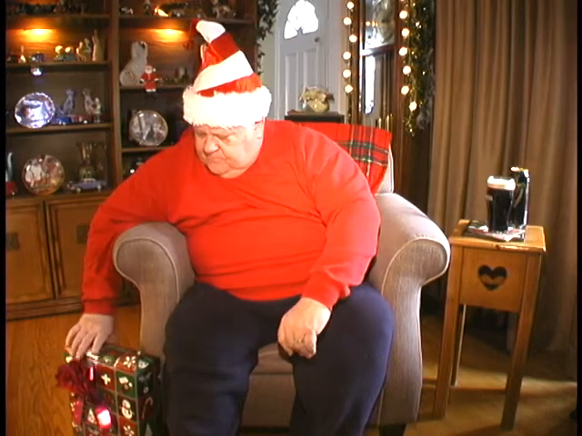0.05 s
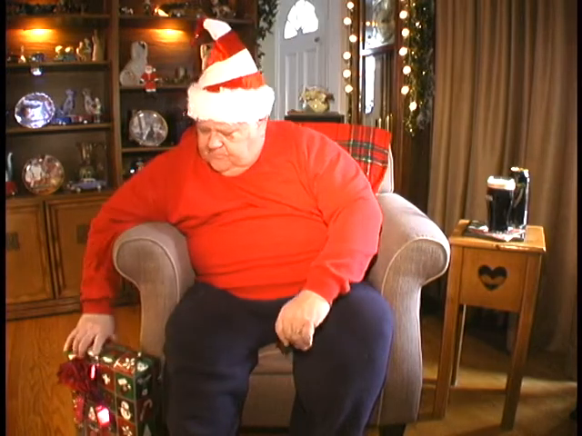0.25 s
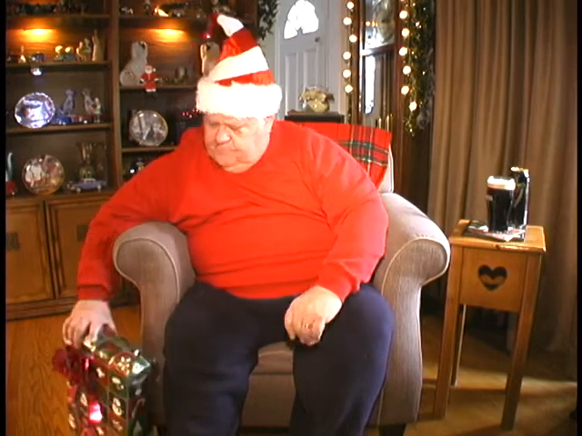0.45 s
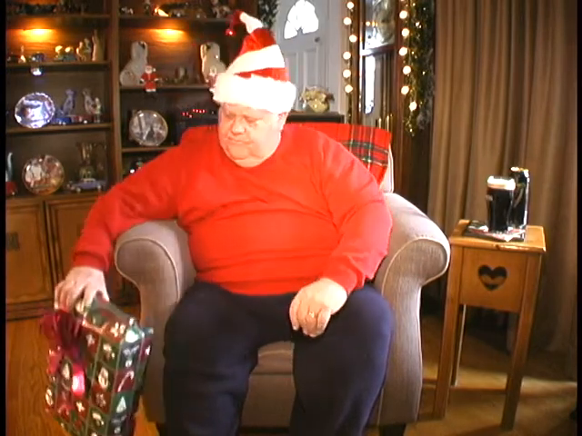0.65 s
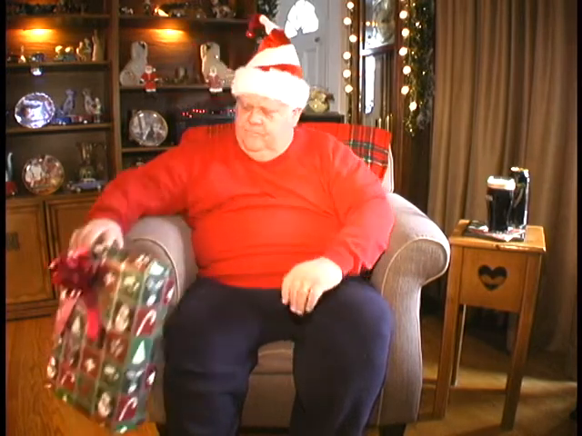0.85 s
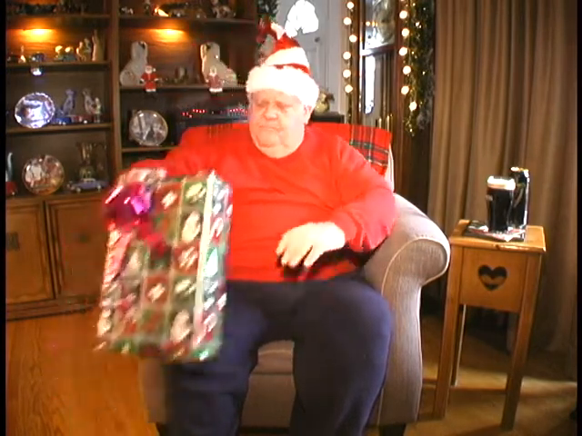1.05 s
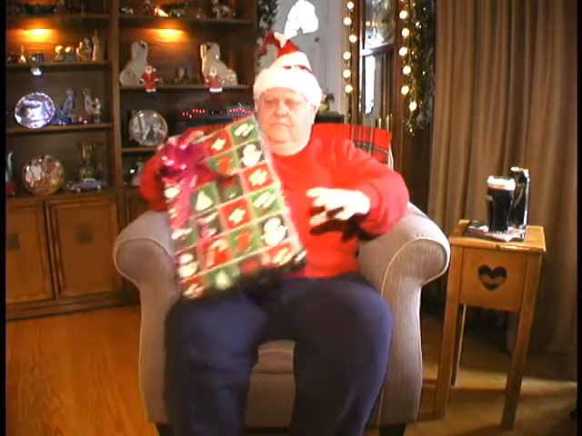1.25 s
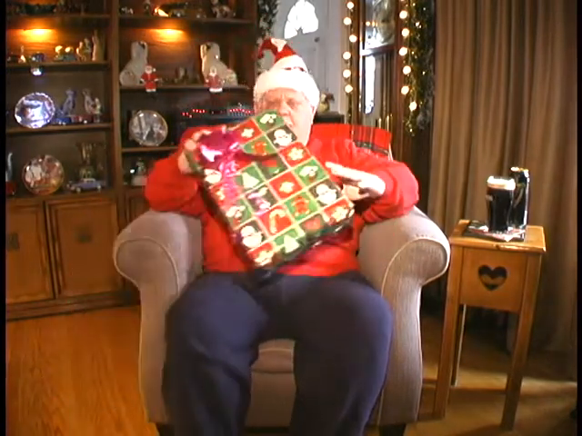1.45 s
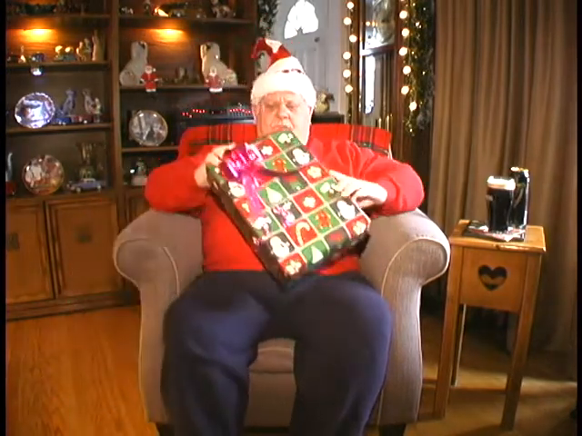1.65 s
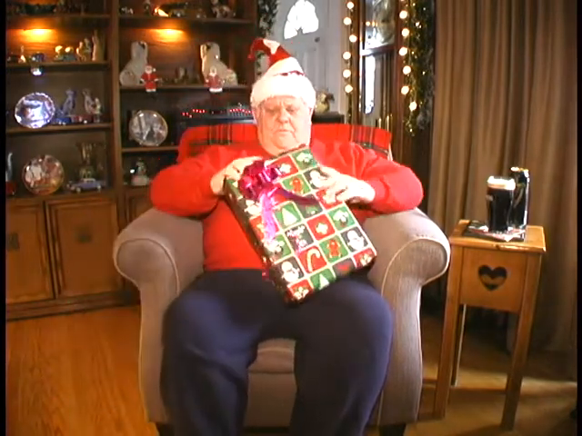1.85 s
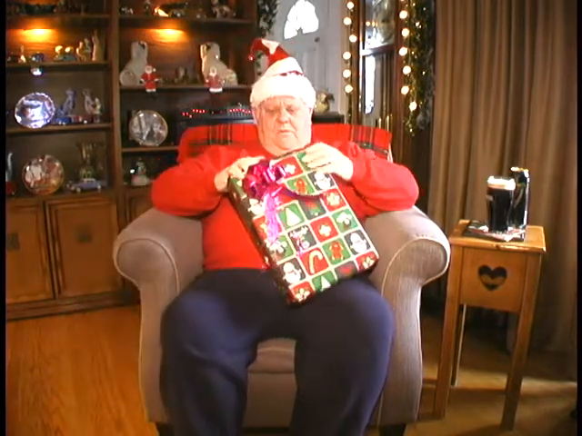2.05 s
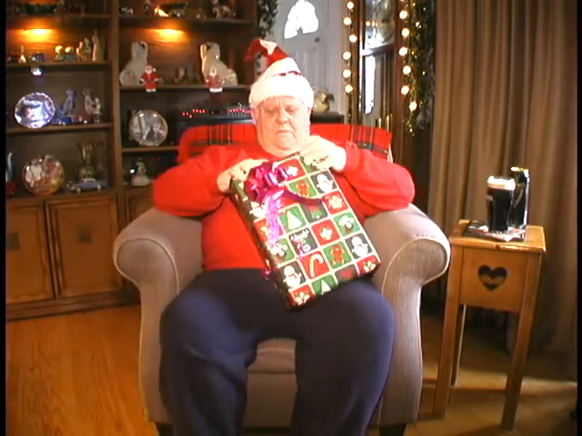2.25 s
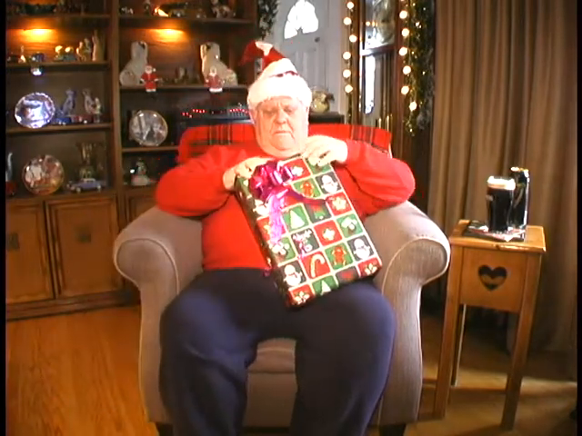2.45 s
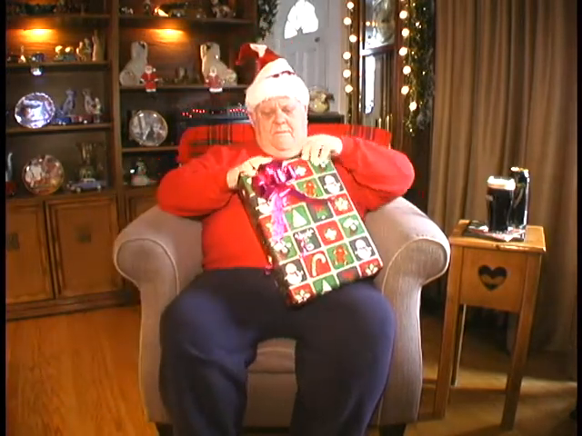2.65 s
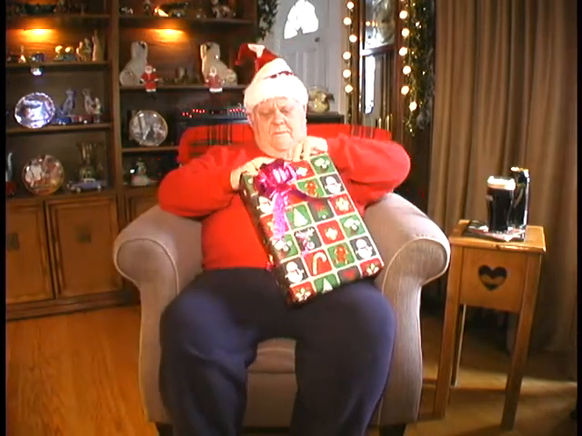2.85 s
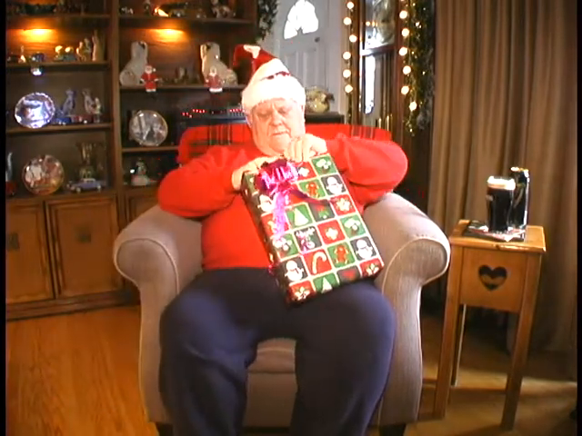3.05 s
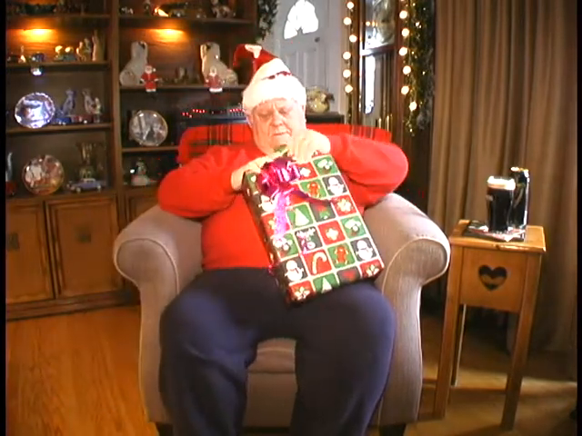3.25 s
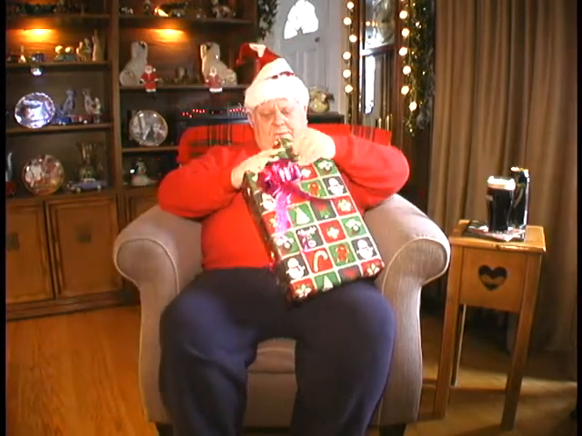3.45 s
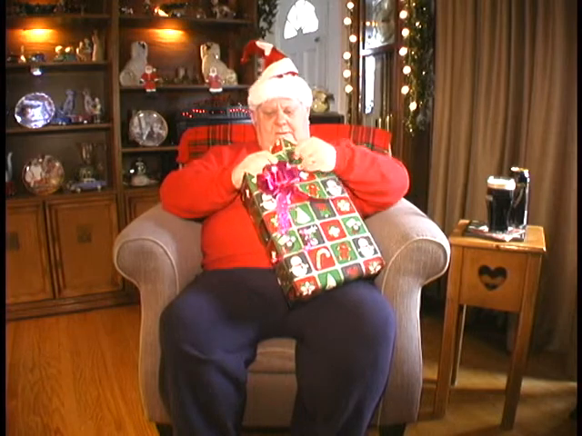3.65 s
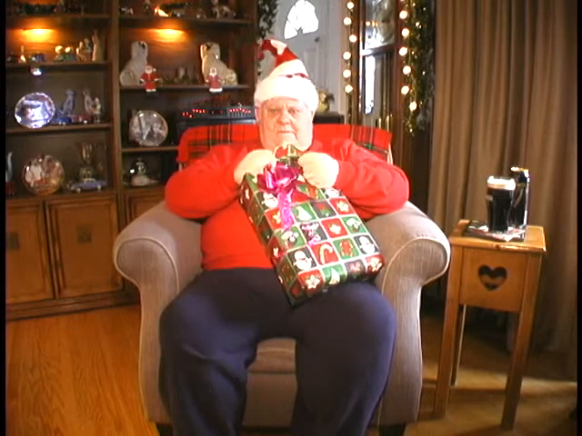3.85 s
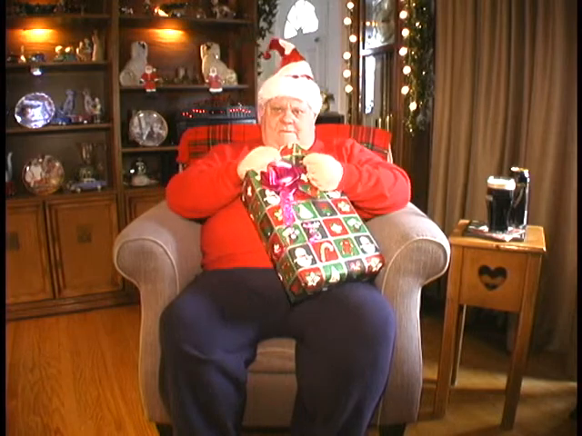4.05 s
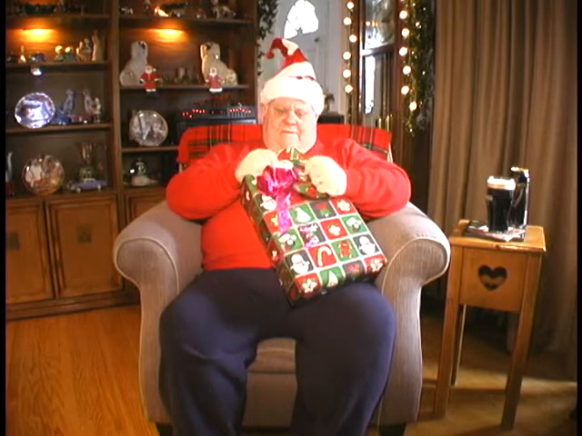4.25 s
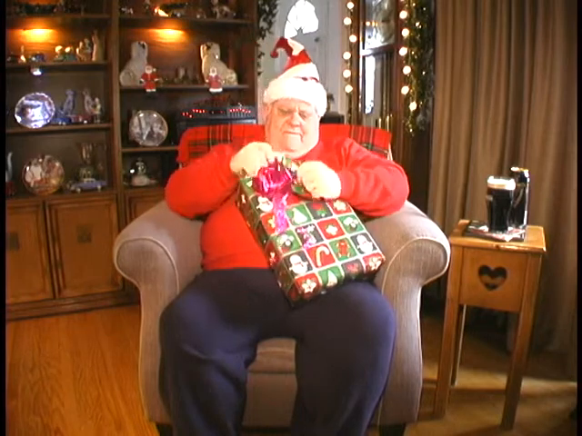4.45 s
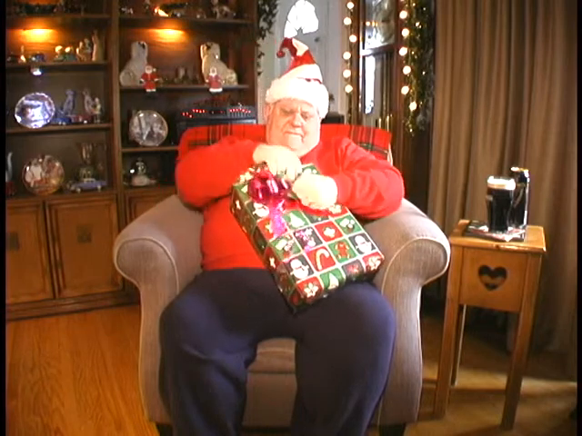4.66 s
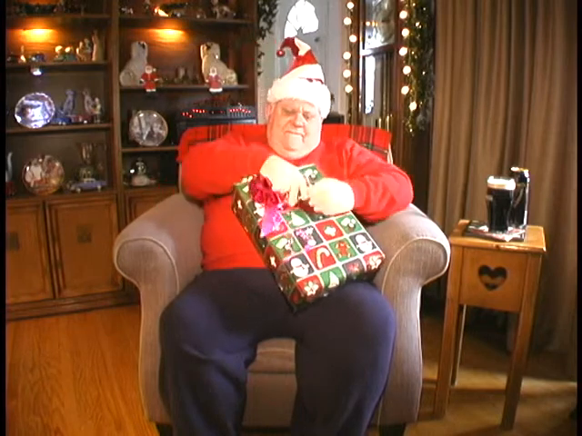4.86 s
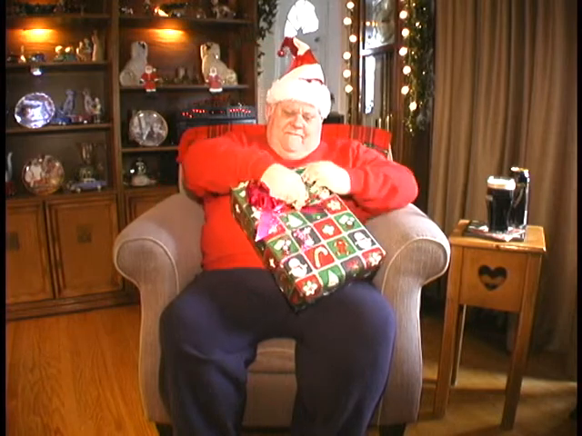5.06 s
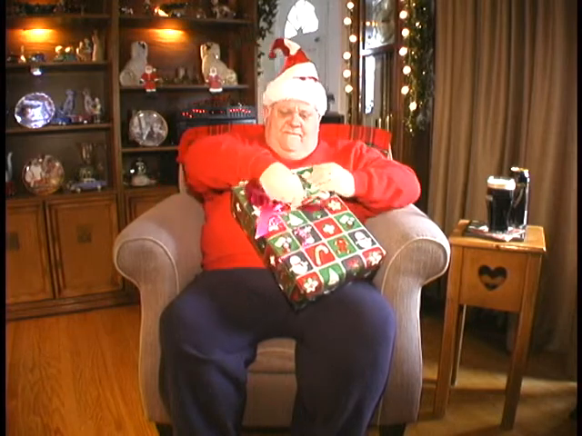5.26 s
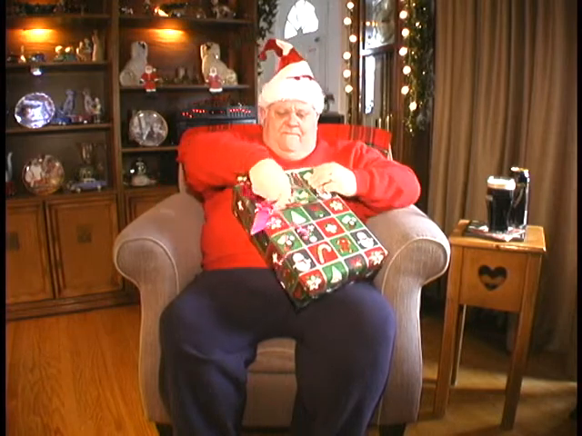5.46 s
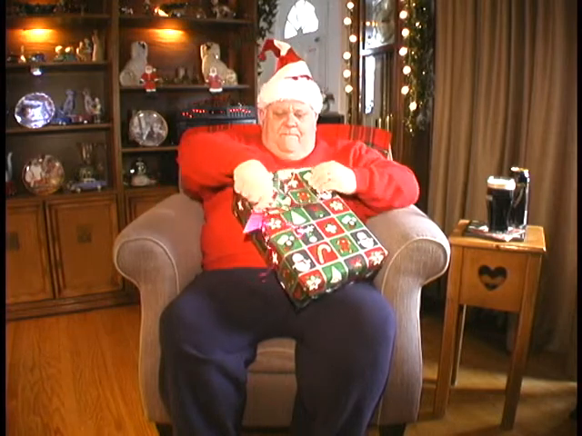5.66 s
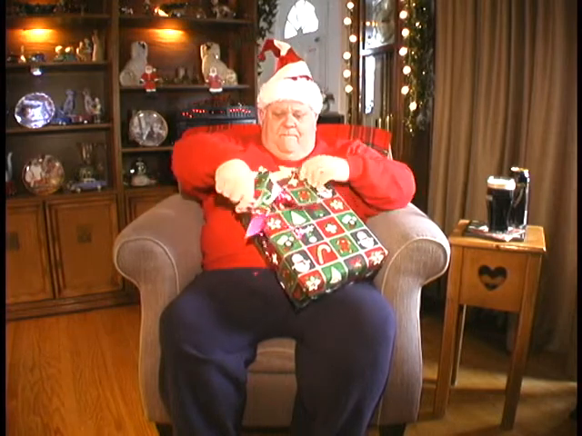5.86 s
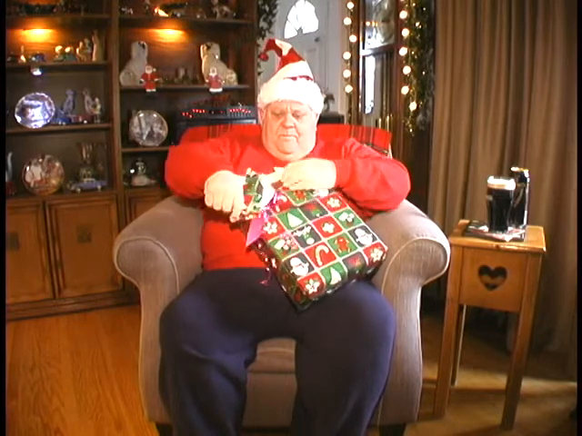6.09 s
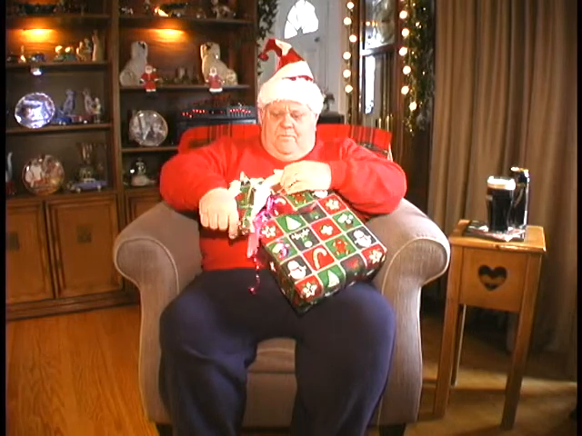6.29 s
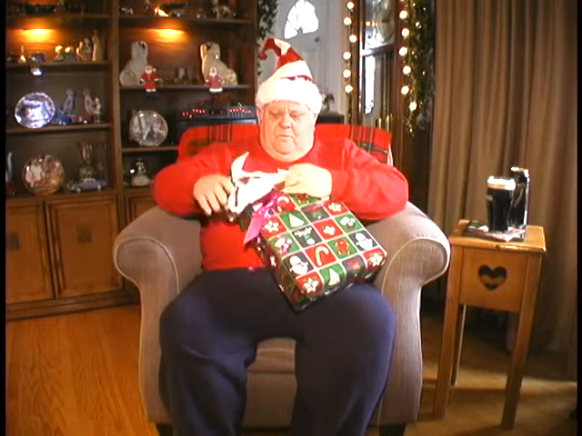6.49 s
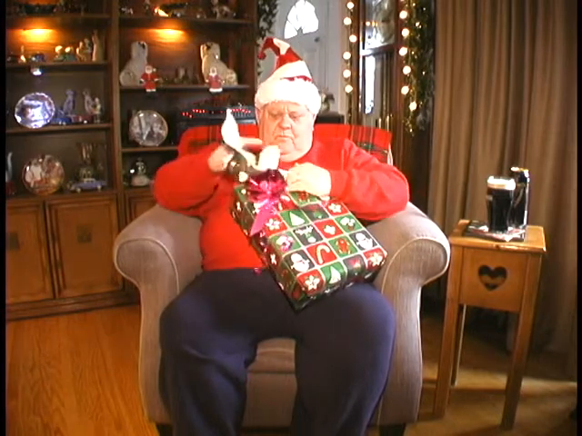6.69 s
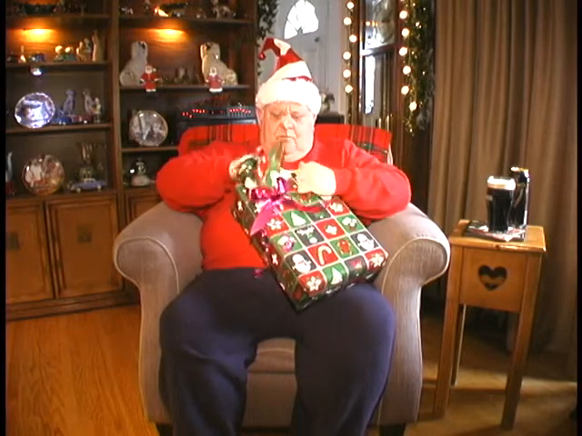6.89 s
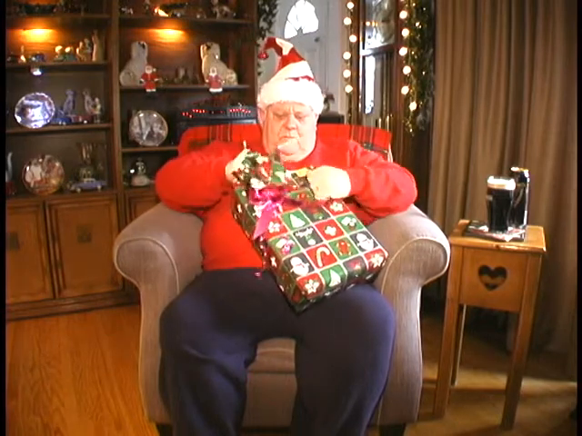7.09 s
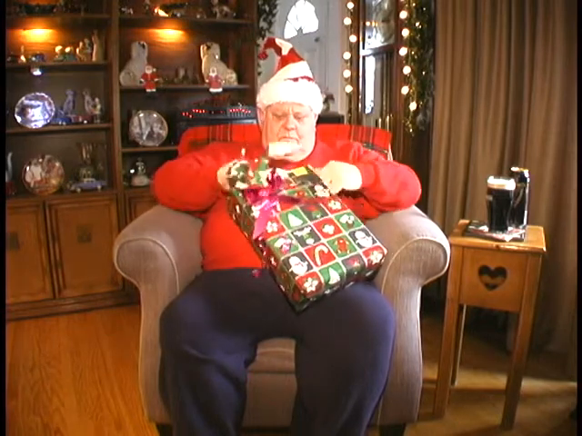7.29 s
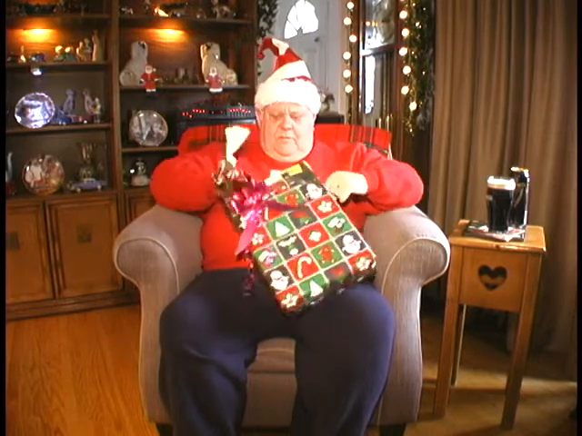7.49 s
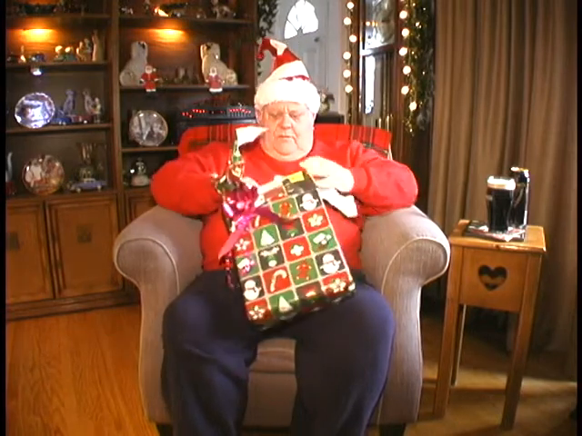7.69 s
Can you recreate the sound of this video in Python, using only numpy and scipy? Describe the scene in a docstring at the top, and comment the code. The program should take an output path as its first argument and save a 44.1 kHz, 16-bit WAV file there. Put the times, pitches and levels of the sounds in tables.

```python
"""In a furnished living room, a few metres away, a gift box wrapped in thin glossy paper is lifted off
the floor onto a lap and torn open. Creases buckle and fibres part in showers of tiny clicks, with
louder snaps among them. The box brushes an armrest once, and its hollow cardboard booms softly under
the hands. Behind it all are the faint rumble of the house, a hiss and a thin electrical whine."""
import sys
import numpy as np
from scipy import signal
from scipy.fft import rfft, irfft, next_fast_len
from scipy.io import wavfile
from scipy.ndimage import uniform_filter1d

SR = 44100
rng = np.random.default_rng(int(sys.argv[2]) if len(sys.argv) > 2 else 0)


def wav_out(sig):
    """Save sig, one row per channel (or a flat mono array), as 16-bit PCM at SR to the path in sys.argv[1]."""
    wavfile.write(sys.argv[1], SR, np.round(np.clip(np.atleast_2d(sig).T, -1, 1) * 32767).astype(np.int16))


N = 340893


def from_db(db):
    """Turn decibels into a number to multiply a sound by."""
    return 10 ** (np.asarray(db) / 20)


def rms_one(x):
    """Scale a sound so that its average strength (rms) is 1."""
    return x / np.sqrt(np.mean(x ** 2) + 1e-30)


def in_time(rows):
    """Join (time_s, level_db) rows with straight lines: silent before the first, holding the last."""
    time_s, level_db = np.transpose(rows)
    return np.interp(np.arange(N) / SR, time_s, level_db, left=-120)


def at_hz(rows, hz):
    """Read between the rows of a (pitch_hz, value) table."""
    pitch_hz, values = np.transpose(rows)
    return np.interp(np.log(hz), np.log(pitch_hz), values)


def drift(rate_hz):
    """A smooth random wobble, about 1 in size."""
    r = np.exp(-80 * np.pi * rate_hz / SR)
    slow = signal.lfilter([1], [1, -2 * r, r * r], rng.standard_normal(N // 40 + 2002))[2000:]
    return np.interp(np.arange(N) / 40, np.arange(len(slow)), rms_one(slow))


def third_octaves(lowest_hz, count):
    """Filters that each let a third of an octave through, as (centre_hz, filter) pairs."""
    edges = lowest_hz * 2 ** (np.arange(count + 1) / 3)
    return [(np.sqrt(low * high), signal.butter(2, [low, high], "band", fs=SR, output="sos"))
            for low, high in zip(edges, edges[1:])]


def noise_spectra(colour):
    """The spectra of two unrelated noises with the given tone colour, and their frequencies."""
    hz = np.maximum(np.fft.rfftfreq(next_fast_len(N), 1 / SR), 1)
    white = rfft(rng.standard_normal((2, next_fast_len(N))))
    return white * from_db(at_hz(colour, hz)), hz


def left_right(mid, side, alike):
    """Mix two noises into left and right: alike is 0 for unrelated sides, 1 for equal ones."""
    return np.sqrt(1 + alike) * mid + np.sqrt(1 - alike) * side * [[1], [-1]]


def house():
    """Steady rumble and hiss, alike on both sides only in the bass, with thin electrical tones."""
    # tone colour of the rumble and hiss: pitch_hz, level_db
    colour = [(12, -29), (20, -3), (70, 1.5), (284, -4), (386, -11.5), (693, -13), (843, -13),
              (1390, -18.5), (1510, -13.5), (1890, -17.5), (4020, -18), (6650, -22), (8550, -18.5),
              (15800, -27)]
    # how alike left and right are: pitch_hz, likeness (0 to 1)
    likeness = [(60, 0.96), (180, 0.94), (550, 0.038), (1650, 0.16), (4970, 0.11), (15000, 0.14)]
    # steady electrical tones: pitch_hz, level_db
    tones = [(59.2, -76), (4027, -87), (7962, -92), (8409, -93), (11090, -95), (11386, -95)]
    (mid, side), hz = noise_spectra(colour)
    noise = irfft(left_right(mid, side, at_hz(likeness, hz)))[:, :N]
    t = np.arange(N) / SR
    whine = sum(np.sqrt(2) * from_db(db) * np.sin(2 * np.pi * hz * t) for hz, db in tones)
    noise_db = -63.5 + 0.2 * drift(rate_hz=7.1)
    return from_db(noise_db) * rms_one(noise) + whine


def reflections():
    """The room's answer to one click: a few near echoes, then a wash whose treble dies first."""
    # bounces off the box face, floor and cabinet: delay_s, level_db
    echoes = [(.0021, -12.5), (.0066, -13), (0.0101, -15.5)]
    fade_s, treble_fade_s, tail_db = 0.21, 0.11, -6  # a fade is the time to drop 60 dB
    t = np.arange(SR // 2) / SR
    mid, side = rng.standard_normal((2, len(t)))
    side = signal.sosfilt(signal.butter(2, 330, "high", fs=SR, output="sos"), side)  # same bass each side
    tail = left_right(mid, side, alike=0.069)
    dull = signal.sosfilt(signal.butter(1, 4500, fs=SR, output="sos"), tail)
    tail = dull * from_db(-60 * t / fade_s) + (tail - dull) * from_db(-60 * t / treble_fade_s)
    tail *= np.clip(t / 0.0093, 0, 1)  # the echoes need time to thicken
    response = from_db(tail_db) * rms_one(tail) / np.sqrt(len(t))
    for delay_s, db in echoes:
        response[:, round(delay_s * rng.uniform(.8, 1.2) * SR)] += from_db(db)
    return response


def living_room(sound, paths=4):
    """The sounding spot wanders over the sheet, so the sound reaches the walls by changing paths."""
    spot = rng.integers(0, paths, N // 600 + 1).repeat(600)[:N]
    echoes = sum(signal.oaconvolve((sound * (spot == k))[None], reflections(), axes=1)[:, :N]
                 for k in range(paths))
    dip_hz, width_hz = 477, 53  # the bounce off the floor cancels this pitch
    return signal.lfilter(*signal.iirnotch(dip_hz, dip_hz / width_hz, SR), sound + echoes)


def armrest_brush():
    """The wrapped box rubs over the armrest cloth with one smooth swish."""
    # rise and fall of the swish: time_s, level_db
    sweep = [(1.2, -82), (1.212, -71), (1.308, -52), (1.348, -54), (1.37, -60), (1.416, -82), (1.43, -82)]
    # tone colour of paper rubbing on cloth: pitch_hz, level_db
    cloth = [(600, -16), (900, -8), (3000, -5.5), (4100, 0), (5500, -7.5), (8000, -16), (12000, -25)]
    spectra, _ = noise_spectra(cloth)
    end_s = sweep[-1][0]
    level_db = np.where(np.arange(N) < end_s * SR, in_time(sweep), -120)
    return from_db(level_db - 3.5) * rms_one(irfft(spectra[0])[:N])


def cardboard_box(wide_db):
    """Moving paper shakes the hollow box and bumps push it; both make it boom at a few low pitches."""
    # shaking of the box when the paper's wide patches are at -47 dB: time_s, level_db
    shaking = [(0, -39.5), (2.0, -37.5), (3.2, -41), (4.3, -42.5), (5.1, -38.5), (6.2, -43.5),
               (6.75, -39.5), (7.35, -41.5), (7.5, -50.5), (7.73, -47)]
    # the box bumps a lap or palm: start_s, strength_db
    thumps = [(1.754, -43), (1.784, -44), (1.814, -46), (2.939, -43.5), (3.459, -57), (3.828, -41),
              (4.99, -48), (5.195, -45.5), (5.769, -47), (6.081, -47.5), (6.741, -52), (7.379, -47)]
    # the box's own low notes: pitch_hz, width_hz, level_db
    notes = [(40, 34, -11), (62, 21, -5), (87, 46, 1), (117, 57, -1), (159, 36, -0.5), (196.3, 15.3, 4),
             (297, 92, 0), (393, 44, -11.5)]
    follows, lag_s = .9, 0.0074  # the cardboard follows most of the paper's swing, a little late
    sluggish_db = uniform_filter1d(wide_db, int(2 * lag_s * SR) + 1, origin=int(lag_s * SR))
    shake_db = in_time(shaking) + follows * (sluggish_db + 47) + 1.46 * drift(rate_hz=29)
    shake = from_db(shake_db) * rng.standard_normal(N)
    bumps = np.zeros(N)
    for start_s, strength_db in thumps:
        bumps[round(start_s * SR)] = from_db(strength_db + 49.5)
    shake += signal.sosfilt(signal.butter(1, 120, fs=SR, output="sos"), bumps)  # soft contact is dull
    boom = np.zeros(N)
    for k, (hz, width_hz, level_db) in enumerate(notes):
        r = np.exp(-np.pi * width_hz / SR)
        poles = [1, -2 * r * np.cos(2 * np.pi * hz / SR), r * r]
        boom += (-1) ** k * from_db(level_db) * signal.lfilter([1 - r, 0, r - 1], poles, shake)
    return signal.sosfilt(signal.butter(2, 420, fs=SR, output="sos"), boom)


def handling():
    """How hard the hands stir the paper: levels in dB for wide patches, small creases and fine fibres."""
    # fingers resting and sliding: time_s, crease_db, wide_extra_db, fibre_extra_db
    touches = [(0, -59, -7, -3), (.1, -70, -4, -13), (.5, -84, 0, -10), (.75, -76.5, 1.5, -30),
               (1.43, -74, -0.5, -19), (1.56, -65.5, -7.5, -5.5), (1.92, -64, -12, -1),
               (2.3, -65, -0.5, -14), (2.84, -62, 0, -14), (3.03, -54, 1.5, -13), (3.6, -58, -1.5, -11),
               (4.0, -53, -2, -15), (4.6, -58, -7, -11), (5.2, -57, 2, -13), (5.6, -47.5, -4, -13),
               (5.9, -60, 2.5, -11), (6.05, -66, -8, -11), (6.27, -57, -13, -15), (6.59, -60, 1, -13),
               (6.98, -53, -5.5, -20), (7.5, -46.5, -0.5, -17), (7.73, -58, -1.5, -16)]
    # each pull, crumple or rip: peak_s, swell_s, fade_s, crease_db, wide_extra_db, fibre_extra_db
    crumples = [(.056, 0.019, 0.072, -58.5, 5, -9), (.163, .02, 0.023, -52, -21, -16),
                (.275, 0.089, .09, -61, -1, -25), (.392, .025, 0.056, -61, -2, -17),
                (.581, 0.023, 0.027, -68, 1, -16), (.632, .02, .09, -68, -3, -14),
                (1.497, .04, 0.042, -61.5, -14, -11), (1.757, .008, 0.022, -43, 2, -20),
                (1.785, 0.032, 0.074, -48.5, -3, -12), (1.995, 0.069, .15, -60, -8, -6),
                (2.143, 0.047, 0.028, -55.5, -3, -24), (2.223, .03, 0.033, -47.5, -10.5, -14),
                (2.339, .05, .2, -59, -8, -14), (2.549, 0.077, 0.12, -48, -8, -18),
                (2.755, 0.057, 0.042, -43, -5, -10), (2.939, 0.061, 0.056, -37.5, 0, -6.5),
                (3.08, 0.037, 0.063, -41, -4.5, -6), (3.214, 0.079, 0.47, -43, -5, -10),
                (3.458, 0.1, 0.089, -42.5, -0.5, -7.5), (3.753, 0.097, .04, -47.5, 2, -10),
                (3.825, 0.036, 0.076, -33.5, -0.5, -10.5), (4.124, 0.073, .18, -36, -6, -9.5),
                (4.25, 0.11, 0.032, -39.5, -0.5, -12), (4.324, 0.038, 0.036, -45, 0.5, -20),
                (4.447, 0.062, 0.032, -40.5, -1, -16), (4.52, 0.041, 0.06, -40.5, -4, -15),
                (4.666, 0.092, 0.054, -43.5, 0, -9.5), (4.812, 0.16, .05, -40, -4, -17),
                (4.876, 0.026, 0.077, -41, -3, -20), (5.011, 0.19, 0.14, -40.5, -3.5, -13),
                (5.2, 0.016, 0.043, -40.5, -12.5, -16), (5.333, 0.092, 0.19, -43, -2.5, -10),
                (5.564, 0.24, 0.04, -41, -6, -8.5), (5.631, 0.042, .07, -39.5, -10.5, -10),
                (5.739, 0.074, .065, -35, -7, -11.5), (5.954, 0.028, 0.025, -54.5, 0, -6),
                (6.022, 0.054, 0.028, -51, -8, -12), (6.122, 0.036, 0.02, -40.5, -10, -8),
                (6.194, 0.048, 0.054, -42.5, -4, -9), (6.357, 0.12, 0.063, -45.5, -3.5, -8),
                (6.502, 0.14, 0.058, -48, -4, -10), (6.634, 0.011, 0.19, -38, -6.5, -12.5),
                (6.723, 0.068, 0.045, -38, -12.5, -6.5), (6.812, 0.043, 0.19, -37, -7, -10.5),
                (7.09, 0.063, 0.18, -46, -1, -16), (7.188, 0.054, 0.031, -44.5, -2, -13),
                (7.358, 0.092, 0.1, -35.5, -3.5, -7), (7.569, 0.11, .035, -44, -3, -17)]
    swing_db = 12  # a crumple climbs this far during its swell and drops as far during its fade
    t = np.arange(0, N / SR + .002, .001)
    peak_s, swell_s, fade_s, crease_db, wide_db, fibre_db = np.transpose(crumples)[:, :, None]
    crumple_db = crease_db - swing_db * np.maximum((peak_s - t) / swell_s, (t - peak_s) / fade_s)
    touch_s, touch_db, touch_wide_db, touch_fibre_db = np.transpose(touches)
    levels_db = []
    for extra_db, touch_extra_db in (wide_db, touch_wide_db), (0, 0), (fibre_db, touch_fibre_db):
        crumple_power = from_db(2 * (crumple_db + extra_db)).sum(axis=0)
        touch_power = from_db(2 * np.interp(t, touch_s, touch_db + touch_extra_db))
        levels_db.append(np.interp(np.arange(N) / SR, t, 10 * np.log10(crumple_power + touch_power)))
    return np.array(levels_db)


def paper_snaps(crease_db):
    """Folds give way: list the clear snaps, plus lesser random ones whose level follows the rustle."""
    # the clearest snaps of the paper: start_s, level_db, pitch_hz, spread_octaves
    clear = [(.039, -42, 4500, 1.0), (.0533, -25.5, 4800, 0.4), (.0791, -29.5, 1940, 1.8),
             (.1073, -28, 5000, .9), (.1525, -28.5, 5380, 0.84), (.2118, -26, 4950, .94),
             (.2692, -46, 1380, 0.31), (.3323, -39, 4000, .77), (.3816, -35, 5270, .7),
             (.3882, -25.5, 5060, 0.95), (.4151, -37.5, 2790, 1.15), (.432, -39, 3870, 0.86),
             (.5719, -38.5, 3890, 0.85), (.6215, -30, 2930, 1.24), (1.7548, -27, 3950, 1.5),
             (1.9868, -37, 6770, 0.71), (2.1356, -34, 3640, 1.3), (2.159, -35, 7230, .69),
             (2.1908, -28, 5660, 0.8), (2.214, -27.5, 4930, 0.9), (2.3304, -31.5, 4770, 1.3),
             (2.465, -32, 4030, 0.99), (2.5, -35, 5300, .8), (2.5392, -26, 5260, 0.84),
             (2.63, -27.5, 4830, 1.1), (2.8466, -24, 5930, .63), (2.855, -21.5, 6140, .61),
             (2.89, -23, 5090, 1), (2.9086, -17, 3760, 1.5), (2.9287, -27, 1580, .29),
             (2.94, -30, 2190, .4), (3.0052, -18.5, 5000, .9), (3.1685, -21, 6240, 0.95),
             (3.206, -19, 6210, 0.74), (3.273, -18.5, 5300, .66), (3.3186, -30.5, 1910, 0.48),
             (3.359, -23, 3150, 2), (3.5715, -29, 5570, 1.4), (3.6293, -19.5, 6100, 0.79),
             (3.7026, -27, 3390, 1.1), (3.7481, -25, 4620, 0.99), (3.8058, -23, 2930, 0.78),
             (3.8169, -25, 3150, 1.1), (3.8241, -20, 4110, 1.1), (3.8814, -22, 4000, 1.2),
             (3.9094, -22.5, 6240, 0.71), (3.9974, -23, 4140, 1), (4.0381, -28, 2210, .49),
             (4.0593, -17, 3880, 0.98), (4.1447, -27, 2170, .4), (4.2097, -12, 6200, 0.73),
             (4.4377, -23, 4970, 1.2), (4.453, -23.5, 3860, 1.2), (4.5068, -29, 2180, 0.76),
             (4.5174, -26, 1870, .74), (4.5413, -26, 1730, 0.85), (4.5487, -22, 2960, 1.2),
             (4.6447, -33, 2100, .49), (4.7951, -23, 3870, 1.2), (4.817, -20, 4510, .77),
             (4.8614, -21, 3730, 0.95), (4.9505, -21, 5030, 0.63), (5.079, -27, 6000, 1.2),
             (5.1291, -24.5, 2640, 0.78), (5.276, -23.5, 5080, .97), (5.3249, -20.5, 3570, 1.04),
             (5.617, -14, 6600, .66), (5.627, -21, 6500, 0.64), (5.636, -21, 6800, .6),
             (5.6902, -12, 5870, 0.9), (5.831, -27, 6150, 1), (5.8685, -27.5, 3160, 1.3),
             (5.876, -30, 5110, 1.0), (5.9457, -25.5, 5800, .77), (6.0677, -31, 2890, 1.2),
             (6.0888, -22, 4360, 2.1), (6.136, -27, 3680, .87), (6.1656, -15.5, 5830, 0.77),
             (6.192, -17.5, 5800, 0.82), (6.2218, -23, 6150, 0.42), (6.2854, -20, 6050, 0.73),
             (6.3329, -22, 3620, 1.3), (6.3593, -22.5, 4590, 1.4), (6.4257, -25, 5740, 0.52),
             (6.4691, -25.5, 6600, 0.57), (6.499, -21.5, 4830, 0.84), (6.5734, -29, 5820, 1),
             (6.6347, -21, 6100, .8), (6.6659, -16, 6800, 0.35), (6.678, -18, 6290, .88),
             (6.7066, -19, 6750, .61), (6.7278, -20, 6700, .4), (6.7193, -12, 7210, 0.37),
             (6.745, -15, 6130, 0.6), (6.761, -13, 8000, .75), (6.79, -12.5, 6300, 0.88),
             (6.8399, -10.5, 5000, 1.1), (6.875, -16, 5530, 0.55), (6.9726, -28, 2180, .84),
             (7.0745, -23, 3300, 1.75), (7.079, -22.5, 5020, .64), (7.1484, -23, 3810, 1.4),
             (7.1922, -17.5, 3900, 1.3), (7.2979, -19.5, 3380, 1.3), (7.3936, -12, 4400, 1.16),
             (7.441, -20, 5900, .51), (7.5124, -23, 1900, 0.54), (7.5667, -20, 3530, 1.3),
             (7.6228, -29.5, 3420, .92), (7.6646, -25, 3580, 1.6)]
    per_s, above_rustle_db, low_hz, high_hz = 22, 10.5, 3000, 7500
    at = np.flatnonzero(rng.random(N) < per_s / SR)
    size, pitch, spread = rng.random((len(at), 3)).T
    level_db = crease_db[at] + above_rustle_db + 8 * (size - .5)
    pitch_hz = low_hz * (high_hz / low_hz) ** pitch
    lesser = np.transpose([at / SR, level_db, pitch_hz, 0.38 + 0.72 * spread])
    return np.transpose([*clear, *lesser])


def shiver(clicks, flutter, fade_s):
    """After each crack the fold shivers in a short, ragged burst of noise."""
    fading = signal.lfilter([0, 1], [1, -np.exp(-1 / (fade_s * SR))], np.abs(clicks))
    return from_db(-20) * flutter * fading


def wrapping_paper(levels_db, clicks_per_s, uneven_db, clump_db, spread_octaves):
    """Every buckling crease clicks around a pitch set by its size; the snaps are the big ones."""
    # tone colour of the rustle, per third of an octave: pitch_hz, level_db
    colour = [(560, -29.5), (800, -24.5), (1150, -13), (1600, -9.5), (2500, -10), (4000, -12), (5500, -12),
              (7000, -5.5), (9000, -5), (11300, -4.5), (14300, -12.5)]
    # treble of the snaps (large folds give little of the very highest): pitch_hz, level_db
    snap_treble = [(8000, -1), (11000, 5), (14300, -14)]
    size_hz = 1700, 5800, 12000  # pitches of wide patches, small creases and fine fibres
    click_at = np.flatnonzero(rng.random(N) < clicks_per_s * from_db(clump_db * drift(rate_hz=25)) / SR)
    strength = from_db(uneven_db * np.minimum(rng.exponential(1, len(click_at)), 3))
    click_hz = 600 * 2 ** (4.71 * rng.random(len(click_at)) ** .5)  # small creases outnumber wide ones
    snap_s, snap_db, snap_hz, snap_spread = paper_snaps(levels_db[1])
    snap_at = (snap_s * SR).astype(int)
    bands = third_octaves(lowest_hz=497, count=15)
    scatter_db = 2.3 * rng.standard_normal((len(snap_s), len(bands)))
    flutter = rng.standard_normal(N)
    sheet = np.zeros(N)
    for k, (hz, band) in enumerate(bands):
        # a click is strongest in the bands near its own pitch
        click_share = np.exp(-(np.log2(hz / click_hz) / spread_octaves) ** 2)
        clicks = np.full(N, 1e-18)
        clicks[click_at] = strength * click_share * rng.standard_normal(len(click_at))
        size_mix = [np.interp(np.log(hz), np.log(size_hz), one) for one in np.eye(3)]
        passed = 2 * hz * (2 ** (1 / 6) - 2 ** (-1 / 6)) / SR  # share of energy this band lets through
        rustle = from_db(size_mix @ levels_db + at_hz(colour, hz)) * rms_one(clicks) / np.sqrt(passed)
        snap_share = 0.027 * snap_spread + np.exp(-(np.log2(hz / snap_hz) / snap_spread) ** 2)
        band_db = snap_db - 10.5 + scatter_db[:, k] + at_hz(snap_treble, hz)
        snaps = np.full(N, 1e-18)
        snaps[snap_at] = from_db(band_db) * snap_share * SR / snap_hz / snap_spread
        shivers = shiver(rustle, flutter, fade_s=0.00079) + shiver(snaps, flutter, fade_s=0.0014)
        # flipping every other band keeps neighbours from cancelling
        sheet += (-1) ** k * signal.sosfilt(band, rustle + snaps + shivers)
    return sheet


def scene():
    """The gift is unwrapped in the room, over the noise of the house."""
    # the gift comes up from the left onto the lap: time_s, left_minus_right_db
    lean = [(0, 3.5), (.6, 2.5), (1.5, 0.8), (7.73, 0.5)]
    levels_db = handling()
    paper = wrapping_paper(levels_db, clicks_per_s=4000, uneven_db=3.5, clump_db=2.0, spread_octaves=0.96)
    gift = paper + cardboard_box(levels_db[0]) + armrest_brush()
    balance = from_db(in_time(lean) * [[.5], [-.5]])
    return living_room(gift) * balance + house()


def record(dry):
    """The microphone's housing softens one treble band, and the very top is cut off steeply."""
    dip_hz, width_hz, share_removed, cutoff_hz = 10450, 1900, 0.52, 15650
    shaded = dry - share_removed * signal.lfilter(*signal.iirpeak(dip_hz, dip_hz / width_hz, SR), dry)
    return signal.sosfilt(signal.ellip(12, .3, 60, cutoff_hz, fs=SR, output="sos"), shaded)


dry = scene()
out = record(dry)
wav_out(out)
```